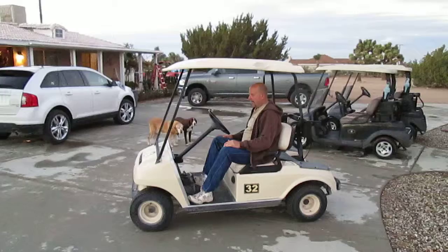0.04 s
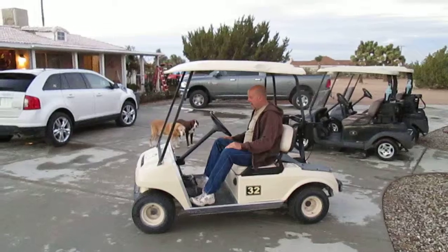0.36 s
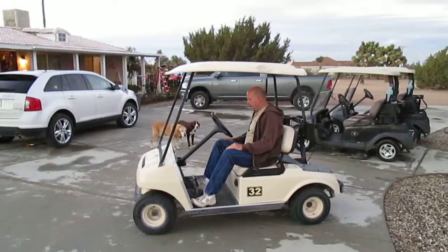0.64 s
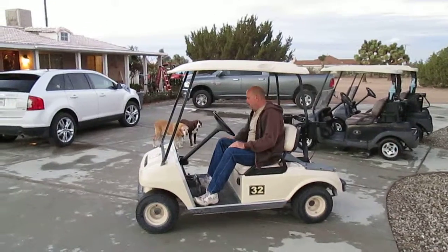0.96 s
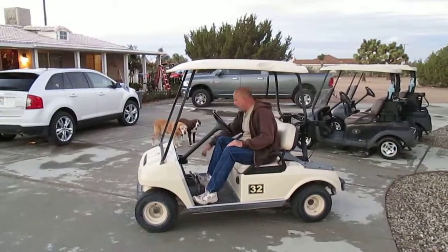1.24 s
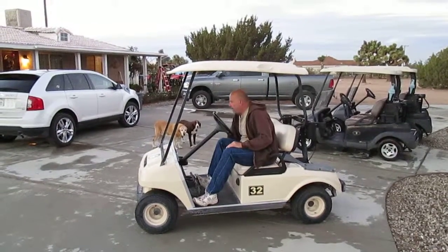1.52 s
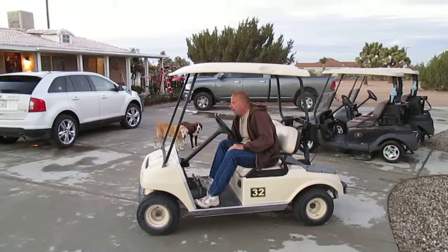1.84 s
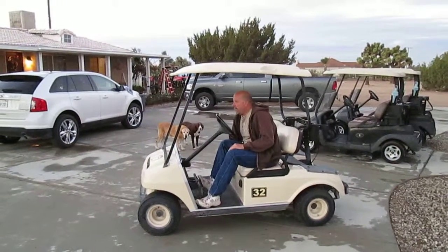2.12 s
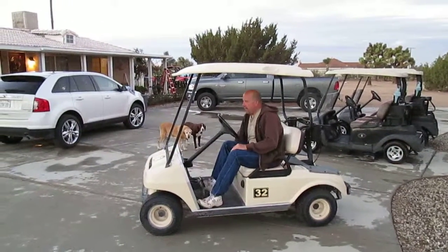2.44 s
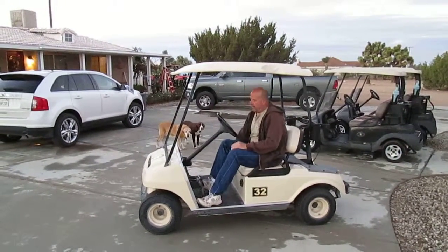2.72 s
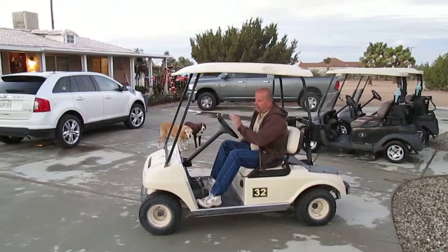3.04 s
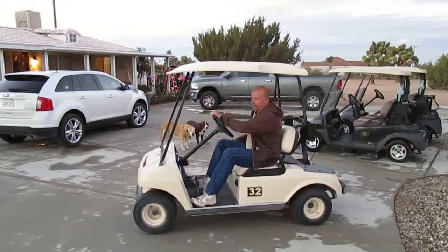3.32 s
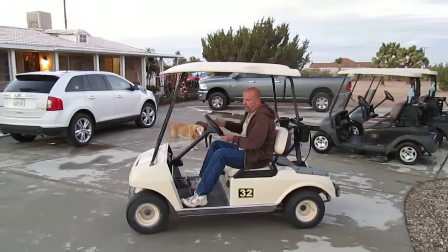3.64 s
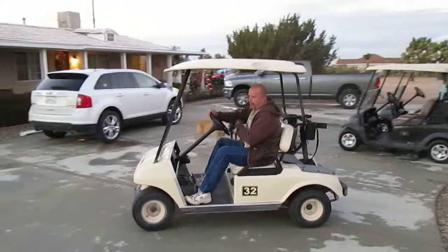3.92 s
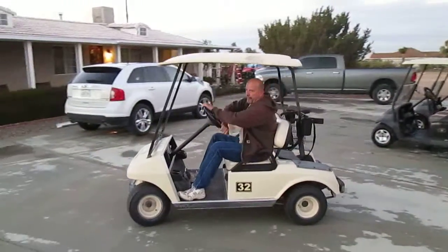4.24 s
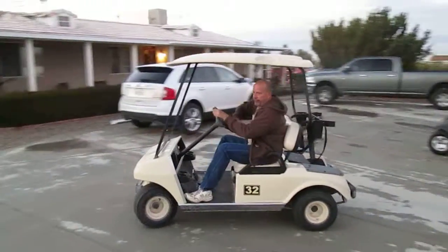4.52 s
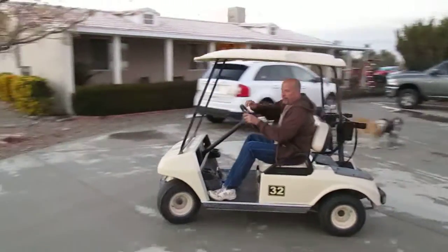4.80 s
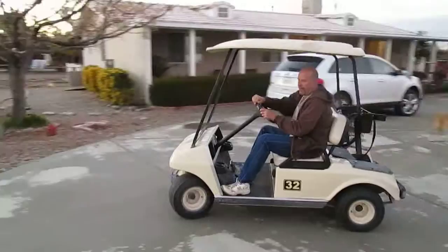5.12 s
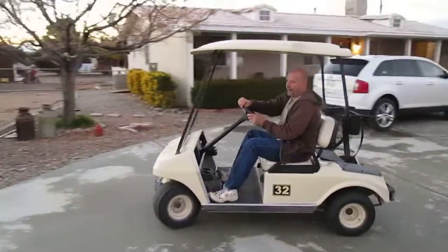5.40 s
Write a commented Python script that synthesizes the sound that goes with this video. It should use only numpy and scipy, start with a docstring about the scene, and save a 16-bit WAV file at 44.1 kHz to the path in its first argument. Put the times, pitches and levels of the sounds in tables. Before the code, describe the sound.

Over a low outdoor rumble and a faint electronic whine, a golf cart gives a hollow knock and a few pedal clunks. The starter clicks and cranks briefly, then a small petrol engine catches. It putters and rattles, with several dull thuds from the body, growing steadily faster and louder as the cart pulls away. One more clunk comes near the end. The cart sounds close by.

```python
"""Pedals clunk, a starter clicks in, and a petrol golf cart catches and putters ever faster and louder.
Each cycle of its single cylinder is a firing knock, an exhaust puff with its hiss and an intake gulp,
under casing rattle and piston slap. The body jolts as the belt grabs; nearby walls answer briefly.
Behind it lie a low outdoor rumble and a faint electronic whine."""
import sys
import numpy as np
from scipy import signal
from scipy.fft import rfft, irfft, next_fast_len
from scipy.io import wavfile
from scipy.ndimage import map_coordinates

SR = 44100
rng = np.random.default_rng(int(sys.argv[2]) if len(sys.argv) > 2 else 0)


def bounce(signal):
    """Save signal as a 16-bit WAV file at the path given by the first command-line argument."""
    frames = np.transpose(np.atleast_2d(signal))
    limited = np.clip(frames, -1, 1)
    pcm = np.round(limited * 32767).astype(np.int16)
    wavfile.write(sys.argv[1], SR, pcm)


N = 249606

FIRST_FIRING_S, IDLE_HZ = 2.584, 11.77
# Level laws, before each layer's own gain: idle_db, per_speed_doubling_db, throttle_db, cranking_db
THROB_LAW, CLATTER_LAW, WHIRR_LAW = (-36, 10.5, 7, 16), (-31.5, 7, 0.16, 4.5), (-51.5, 8.5, 2.5, 4.5)
SLAP_LAW, TAPPET_LAW, HISS_LAW = (-43, 10, -3, -4), (-50, 9.5, -2, -8), (-52, 1.5, 6.5, -8.5)
# Rattling casing and loose parts: freq_hz, density_db
RATTLE_SPECTRUM = [(100, -0.5), (200, -0.5), (350, 0), (460, -13), (560, -6), (800, 3), (950, -4),
                   (1120, -9), (1270, -14.5), (1420, -8.5), (1800, -11.5), (2020, -28), (2300, -14.5),
                   (2900, -101)]
# Contact tick: freq_hz, density_db
TICK_SPECTRUM = [(500, -17), (1500, -6.5), (2300, 4.5), (3500, 6.5), (6000, 2), (9300, -13.5), (15000, -25)]


def engine():
    """Four-stroke single, spun by the starter until it fires and speeds up."""
    # Engine speed: time_s, firing_hz
    speed = [(2.584, 5.76), (2.8, 8.9), (3.0, 10.24), (3.3, 11.23), (3.75, 12.17), (4.0, 14.37),
             (4.3, 17.02), (4.6, 19.47), (5.0, 21.69), (5.3, 23.22), (5.66, 24.42)]
    rate_hz, = curves(speed)
    cycle = np.cumsum(rate_hz) / SR
    cycle -= cycle[round(FIRST_FIRING_S * SR)]
    spark = cycle + 0.012 + 0.004484 * (rate_hz - IDLE_HZ)  # advances with speed
    blend = ramp(rate_hz, 20, 3.5)  # firings merge into a roar
    labour = 0.77 + 0.31 * throttle() - 0.19 * blend  # how far a firing stands out
    pulses = pressure_pulses(cycle, rate_hz, labour) + cover_and_fins(spark, rate_hz, blend)
    pulses += exhaust_valve(cycle, rate_hz)
    sound = pulses / np.sqrt(rate_hz)  # offsets the crowding of pulses at speed
    sound += casing_rattle(cycle, spark, rate_hz, labour)
    sound += piston_slap(spark, rate_hz) + tappet(cycle, rate_hz) + exhaust_jet(cycle, rate_hz)
    sound += clutch() + frame_shudder(rate_hz)
    turning = ramp(clock(), 2.31, 0.054)
    return turning * sound


def pressure_pulses(cycle, rate_hz, labour):
    """Firing, exhaust and intake ring block, muffler and airbox; slow cycles puff fuller."""
    # Cavity and block modes: pitch_hz, level_db, t60_s
    block_modes = [(135, 1, 0.042), (309.6, -0.5, 0.083), (357.5, -7, 0.085), (530, -18, 0.023)]
    muffler_modes = [(48, -6, 0.024), (89.5, 0.5, 0.1), (164.7, -1, 0.099), (341, -8, 0.094)]
    airbox_modes = [(67, -25, 0.043), (111.5, -10.5, 0.082), (227, 0.5, 0.053), (370, -36, 0.16)]
    firing = amp(1) * labour * strokes(cycle, 0.014, block_modes, jitter_s=0.0001, scatter_db=1.5)
    exhaust = 7 * rate_hz ** -0.75 * strokes(cycle, 0.1967, muffler_modes, jitter_s=0.0001, scatter_db=0.6)
    intake = amp(1.5) * strokes(cycle, 0.55, airbox_modes, jitter_s=0.0001, scatter_db=0.1)
    return amp(level_db(THROB_LAW, rate_hz) + 20.5) * (firing - exhaust - intake)


def cover_and_fins(spark, rate_hz, blend):
    """The piston's slap rings the engine cover and cooling fins just before each firing."""
    # Cover and fin modes: pitch_hz, level_db, t60_s
    cover_modes = [(653, -11, 0.034), (722.5, 1, 0.069), (800, -10, 0.03), (1027, 0, 0.048),
                   (1760, -10, 0.087)]
    fin_modes = [(2320, -4.5, 0.047), (3024, -4, 0.075), (3430, -2.5, 0.032), (3628, 9.5, 0.035),
                 (3738, 9.5, 0.017)]
    cover = strokes(spark, -0.0203, cover_modes, jitter_s=0.00034, scatter_db=3.5, detune=0.02)
    fins = strokes(spark, -0.035, fin_modes, jitter_s=0.00051, scatter_db=1.5, detune=0.0067)
    cover *= (rate_hz / 21) ** 0.95
    fins *= amp(-8 - 8 * blend) * np.minimum(rate_hz / 16, 1) ** 4.8
    return amp(level_db(CLATTER_LAW, rate_hz) + 16) * (cover + fins)


def exhaust_valve(cycle, rate_hz):
    """The valve rings with each puff."""
    # Valve modes: pitch_hz, level_db, t60_s
    modes = [(6270, -1.5, 0.042), (6670, -4, 0.073), (7200, -0.5, 0.032), (10850, -12, 0.026)]
    pings = strokes(cycle, 0.2, modes, jitter_s=0.0013, scatter_db=3, detune=0.0085)
    return amp(level_db(HISS_LAW, rate_hz) + 19.5) * pings


def casing_rattle(cycle, spark, rate_hz, labour):
    """The casing rattles hardest at firing and valve changeover; speed fills the gaps."""
    # Bright part of the rattle: freq_hz, density_db
    whirr_spectrum = [(900, -20), (1900, 1.5), (2600, 1), (3300, 3.5), (4300, -1.5), (4900, -3),
                      (5500, -5.5), (7000, -8.5), (9000, -18.5), (11000, -23), (15500, -34)]
    firing = 0.33 * labour * gate(spark, -0.077, rise=0.061, fall=0.42)
    changeover = 0.16 * gate(cycle, 0.46, rise=0.065, fall=0.42)
    shaking = 0.14 * rate_hz ** 0.66 + firing + changeover
    clatter = amp(level_db(CLATTER_LAW, rate_hz) - 2.5) * coloured(contacts(cycle, 0.23), RATTLE_SPECTRUM)
    whirr = amp(level_db(WHIRR_LAW, rate_hz)) * coloured(contacts(cycle, 0.15), whirr_spectrum)
    return shaking * (clatter + whirr)


def contacts(cycle, recurring_share):
    """Many small contacts, partly recurring each cycle in a slowly changing pattern."""
    index = np.arange(N)
    new_cycle = np.diff(np.floor(cycle), prepend=0) != 0
    since = index - np.maximum.accumulate(index * new_cycle)
    first, second, fresh = rng.standard_normal((3, N))
    turn_rad = 2.503 * clock()
    pattern = np.cos(turn_rad) * first[since] + np.sin(turn_rad) * second[since]
    return np.sqrt(recurring_share) * pattern + np.sqrt(1 - recurring_share) * fresh


def piston_slap(spark, rate_hz):
    """A loose clack at low revs that tightens with speed."""
    # Slap: freq_hz, density_db
    spectrum = [(700, 24), (1000, 7.5), (1600, 8.5), (2000, -1), (2300, -0.5), (2600, 2.5), (3000, 5.5),
                (3550, 1), (4150, -10), (5800, -10), (9000, -41)]
    return amp(level_db(SLAP_LAW, rate_hz)) * gate(spark, -0.053, rise=0.048, fall=0.091) * noise(spectrum)


def tappet(cycle, rate_hz):
    """A valve seats once a cycle."""
    # Valve seating: freq_hz, density_db
    spectrum = [(1100, -16), (1450, 7.5), (1800, -0.5), (2250, -1), (2600, -23)]
    seating = gate(cycle, 0.408, rise=0.069, fall=0.087)
    return amp(level_db(TAPPET_LAW, rate_hz)) * seating * noise(spectrum)


def exhaust_jet(cycle, rate_hz):
    """Escaping gas hisses, for a smaller share of the slow cycles."""
    # Gas jet: freq_hz, density_db
    spectrum = [(2000, -5), (3000, 7.5), (4200, 0.5), (5700, 1), (6400, 5.5), (6900, -7), (7600, -4),
                (9700, -12), (10800, -2.5), (11600, -11), (15500, -22.5)]
    jet = gate(cycle, 0.16, rise=0.0017 * rate_hz, fall=0.027 * rate_hz ** 0.84)
    return amp(level_db(HISS_LAW, rate_hz) - 1.5 + wobble(9)) * jet * noise(spectrum)


def clutch():
    """The clutch sings thinly while the belt takes hold."""
    sing_db = np.interp(clock(), [2.6, 2.9, 3.3, 4.2], [-70, -52.5, -61, -57])
    return amp(sing_db) * noise([(4550, -22), (4850, 14), (5200, -30)])


def frame_shudder(rate_hz):
    """The frame shakes once the engine runs."""
    # Shaking frame: freq_hz, density_db
    spectrum = [(25, -3), (45, 1), (75, 6), (120, -31)]
    return amp(-37) * ramp(rate_hz, 7, 3.8) * noise(spectrum)


def knocks():
    """Clunks, jolts and hollow sounds, plus one light click, the starter solenoid and a pedal spring."""
    # Pedals, linkage and loose metal: start_s, clack_db, thud_db
    clunks = [(1.464, -53, -22.5), (1.973, -46.5, -26.5), (2.019, -44.5, -25), (2.052, -39, -25),
              (2.075, -39, -20), (2.277, -40.5, -53), (2.306, -34, -41), (2.571, -43, -21),
              (2.641, -39.5, -43), (4.823, -25, -16)]
    # Body jolts as the engine catches and the belt grabs: start_s, thud_db
    jolts = [(2.58, -23.5), (2.887, -16), (3.01, -14), (3.142, -18), (3.749, -18), (4.111, -15),
             (4.176, -15.5)]
    # A hollow knock, then a hollow chuff as the starter cranks: start_s, level_db
    hollows = [(.805, -34), (2.472, -35)]
    # Starter switch and pedal return spring: pitch_hz, level_db, t60_s
    solenoid_modes = [(312, 2.5, 0.074), (560, -2, 0.068), (1890, -7, 0.048), (2210, -4, 0.044)]
    spring_modes = [(9200, -2, 0.043), (9400, -9, 0.064)]
    out = np.zeros(N)
    for start_s, clack_db, thud_db in clunks:
        add(out, start_s, knock(thud_db, clack_db, tick_db=clack_db - 7.5))
    for start_s, thud_db in jolts:
        add(out, start_s, knock(thud_db, clack_db=thud_db - 18, tick_db=thud_db - 32))
    for start_s, hollow_db in hollows:
        add(out, start_s, amp(hollow_db) * hollow_sound())
    add(out, 1.05, knock(thud_db=-59, clack_db=-61, tick_db=-51.5))
    add(out, 2.309, amp(-26) * ring(solenoid_modes, scatter_db=3, attack_s=0.0036))
    add(out, 2.051, amp(-39.5) * ring(spring_modes, scatter_db=1, attack_s=0.002))
    return out


def knock(thud_db, clack_db, tick_db):
    """One contact thuds in panels and body, clacks in the linkage and shakes loose parts."""
    # Panel and linkage modes: pitch_hz, level_db, t60_s
    panel_modes = [(134, -7, 0.066), (191.7, -0.5, 0.17), (268, -7, 0.19), (313, 3, 0.071),
                   (406, -4, 0.051)]
    linkage_modes = [(568, -2.5, 0.26), (795, -21, 0.033), (824, 0, 0.21), (1130, -7, 0.15),
                     (1253, -0.5, 0.18), (1723, -4, 0.082), (2084, 0, 0.063)]
    # Hollow body: freq_hz, density_db
    boom_spectrum = [(80, -8), (150, 2), (220, 2), (320, 0.5), (450, -15.5), (600, -27)]
    thud = amp(thud_db - 9) * ring(panel_modes, scatter_db=2.5, attack_s=0.0029)
    boom = amp(thud_db - 6.5) * burst(boom_spectrum, t60_s=0.22, attack_s=0.0044)
    clack = amp(clack_db - 6) * ring(linkage_modes, scatter_db=3, attack_s=0.0025)
    loose = amp(clack_db + 6.5) * burst(RATTLE_SPECTRUM, t60_s=0.13, attack_s=0.00029)
    tick = amp(tick_db + 2) * burst(TICK_SPECTRUM, t60_s=0.091, attack_s=0.0008)
    return thud + boom + clack + loose + tick


def hollow_sound():
    """A knock or chuff: a soft-edged hollow ring with a puff of noise and a faint tick."""
    # Hollow resonance: pitch_hz, level_db, t60_s
    modes = [(631, 6.5, 0.039), (833, -1, 0.16), (1050, 2, 0.072), (1343, -13, 0.16)]
    hollow = ring(modes, scatter_db=-4.5, attack_s=0.0064)
    puff = amp(-5) * burst(RATTLE_SPECTRUM, t60_s=0.17, attack_s=0.009)
    tick = amp(-30) * burst(TICK_SPECTRUM, t60_s=0.1, attack_s=0.005)
    return hollow + puff + tick


def walls(x, t60_s, wet_db):
    """A house front and parked cars scatter a short answer."""
    t = np.arange(SR // 2) / SR
    tail = coloured(rng.standard_normal(len(t)), [(120, -7.5), (500, 15), (3000, 1.5), (15000, 12.5)])
    tail *= amp(-60 * t / t60_s) * (t > 0.008)
    return x + amp(wet_db) * signal.fftconvolve(x, tail / np.linalg.norm(tail))[:N]


def yard():
    """Uneven outdoor rumble, distant air and a far hum that fades."""
    # Outdoor background: freq_hz, density_db
    rumble_spectrum = [(11, -84), (18, -28), (27, -13), (52, -2), (70, -4), (112, -2.5), (166, -14.5),
                       (215, -18), (260, -27), (340, -80), (570, -120)]
    air_spectrum = [(120, -40), (200, 2.5), (422, -3), (755, -2.5), (1210, -11.5), (1330, -12),
                    (2210, -21.5), (2700, -22.5), (2960, -19.5), (3890, -23.5), (5590, -27.5),
                    (8050, -33.5), (8500, -33), (12000, -40.5), (15500, -47)]
    rumble = amp(-40 + 1.55 * wobble(10)) * noise(rumble_spectrum)
    air = amp(-49 + 0.89 * wobble(5.1)) * noise(air_spectrum)
    hum_db = np.interp(clock(), [1.3, 1.6], [-60, -72])
    return rumble + air + amp(hum_db) * noise([(1150, -15), (1310, -1), (1520, -16)])


def electronic_whine():
    """Thin tones that drift together in pitch and flicker separately."""
    # Whine envelope: time_s, level_db
    envelope = [(0.26, -72), (0.6, -75), (0.88, -73), (1.02, -67.5), (1.22, -77), (1.5, -74.5),
                (2.07, -66.5), (2.4, -72.5)]
    # Whine tones: pitch_hz, level_db
    tones = [(2895, -1.5), (2955, -10), (5777, -10.5), (8667, -18), (11795, -19)]
    phase_per_hz = 2 * np.pi * clock() + 0.88 * wobble(26) / tones[0][0]
    whine = sum(amp(db + 2.8 * wobble(6.97)) * np.sin(hz * phase_per_hz) for hz, db in tones)
    return amp(curves(envelope)[0] + 10.5) * whine


def throttle():
    """Opening, 0-1; the driver opens it once."""
    return ramp(clock(), 3.697, 0.18)


def level_db(law, rate_hz):
    """An engine layer's level from speed, throttle and starter."""
    idle_db, doubling_db, throttle_db, cranking_db = law
    cranking = 1 - ramp(clock(), FIRST_FIRING_S - 0.02, 0.07)
    doublings = np.log2(rate_hz / IDLE_HZ)
    return idle_db + doubling_db * doublings + throttle_db * throttle() + cranking_db * cranking


def strokes(cycle, at, modes, jitter_s, scatter_db, detune=0):
    """A pulse rings the modes once a cycle, at the same crank position."""
    out = np.zeros(N)
    running = cycle > 0
    for start_s in np.interp(np.arange(at, cycle[-1], 1), cycle[running], clock()[running]):
        start_s += jitter_s * rng.standard_normal()
        add(out, start_s, ring(modes, scatter_db, attack_s=0.0022, detune=detune))
    return out


def gate(cycle, at, rise, fall):
    """One swell a cycle, rms 1; at, rise and fall in cycles."""
    since = (cycle - at) % 1
    return unit((cycle > at) * (1 - np.exp(-since / rise)) * np.exp(-since / fall))


def ring(modes, scatter_db, attack_s, detune=0):
    """One blow on damped modes, with random strength and optional detuning."""
    t = np.arange(SR // 4) / SR
    hz, db, t60_s = np.transpose(modes)[:, :, None]
    decay = amp(db + scatter_db * rng.standard_normal(hz.shape) - 60 * t / t60_s)
    hz = hz * (1 + detune * rng.standard_normal(hz.shape))
    return np.sum(decay * np.sin(2 * np.pi * hz * t), axis=0) * (1 - np.exp(-t / attack_s))


def burst(spectrum, t60_s, attack_s):
    """A dying puff of coloured noise."""
    t = np.arange(SR // 4) / SR
    envelope = amp(-60 * t / t60_s) * (1 - np.exp(-t / attack_s))
    return envelope * coloured(rng.standard_normal(len(t)), spectrum)


def noise(spectrum):
    """Coloured noise, rms 1."""
    return coloured(rng.standard_normal(N), spectrum)


def coloured(x, spectrum):
    """x shaped by (freq_hz, density_db) points, rms 1."""
    freq_hz, db = np.transpose(spectrum)
    gain = lambda hz: amp(np.interp(np.log(hz + 1), np.log(freq_hz), db, left=-120, right=-120))
    return unit(filtered(x, gain))


def filtered(x, response):
    """x through a frequency response."""
    size = next_fast_len(len(x) + 8192)
    return irfft(rfft(x, size) * response(np.fft.rfftfreq(size, 1 / SR)), size)[:len(x)]


def wobble(knots_per_s):
    """A smooth random curve."""
    return map_coordinates(rng.standard_normal(int(N * knots_per_s / SR) + 4), [clock() * knots_per_s])


def curves(rows):
    """Each column after time_s, interpolated per sample."""
    time_s, *columns = np.transpose(rows)
    return [np.interp(clock(), time_s, column) for column in columns]


def add(track, start_s, sound):
    part = track[round(start_s * SR):][:len(sound)]
    part += sound[:len(part)]


def ramp(x, start, width):
    return np.clip((x - start) / width, 0, 1)


def amp(db):
    return 10 ** (np.asarray(db) / 20)


def unit(x):
    return x / np.sqrt(np.mean(x ** 2) + 1e-20)


def clock():
    return np.arange(N) / SR


def scene():
    """The cart in the open yard, mono."""
    cart = walls(engine() + knocks(), t60_s=0.18, wet_db=-14)
    return (cart + yard() + electronic_whine())[None]


def record(dry):
    """Brief silence, then sound through a bass roll-off, two narrow notches and a band limit."""
    open_s, notches_hz, top_hz = 0.239, (3955, 7910), 15780
    opened = dry[0] * ramp(clock(), open_s, 0.003)
    bass = lambda hz: (hz / (hz - 14j)) ** 2
    notches = lambda hz: np.prod([(hz - c) / (hz - c - 70j) for c in notches_hz], axis=0)
    return filtered(opened, lambda hz: bass(hz) * notches(hz) * (hz < top_hz))[None]


dry = scene()
out = record(dry)
bounce(out)
```